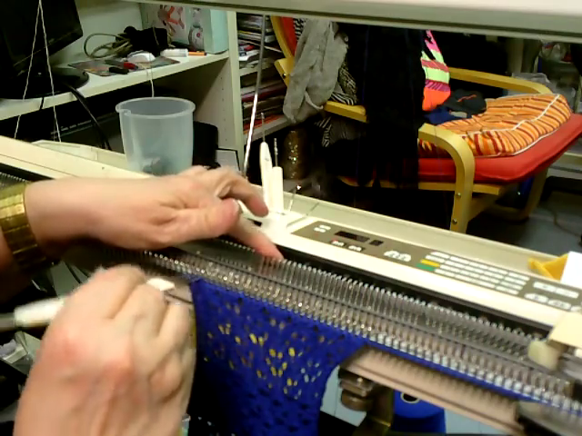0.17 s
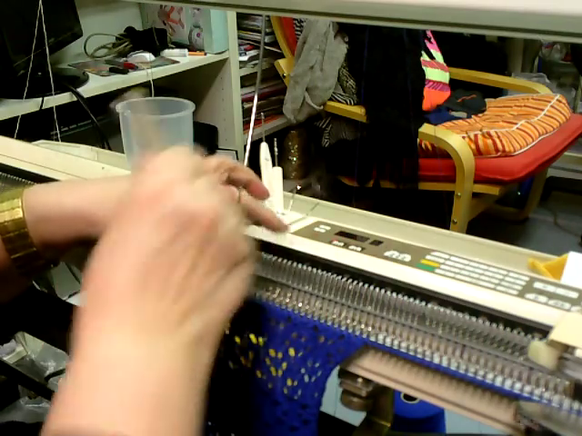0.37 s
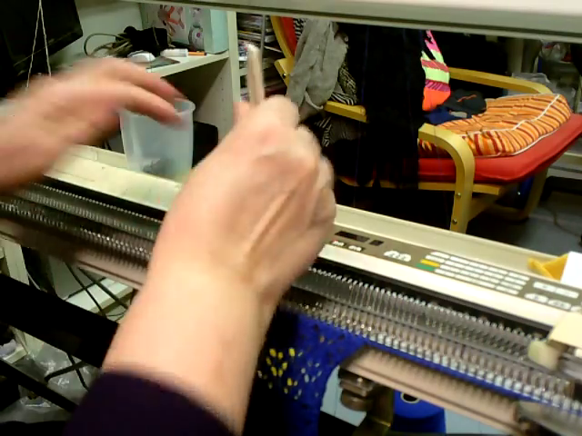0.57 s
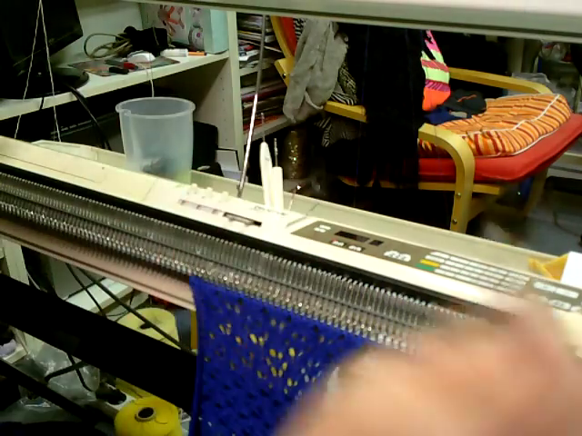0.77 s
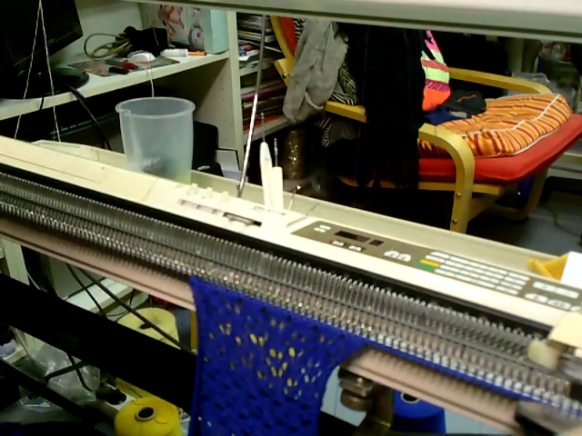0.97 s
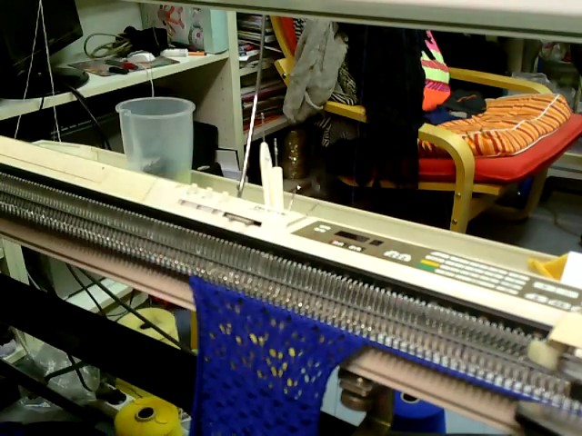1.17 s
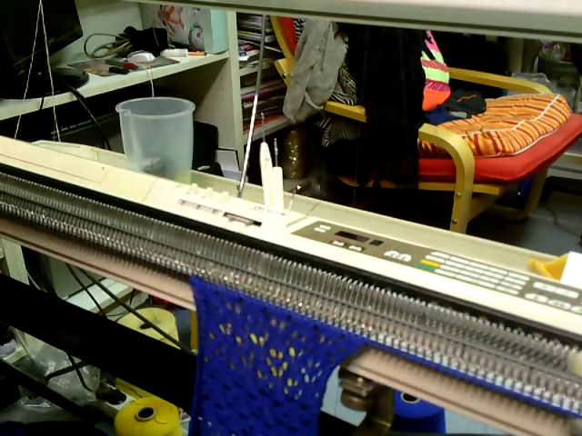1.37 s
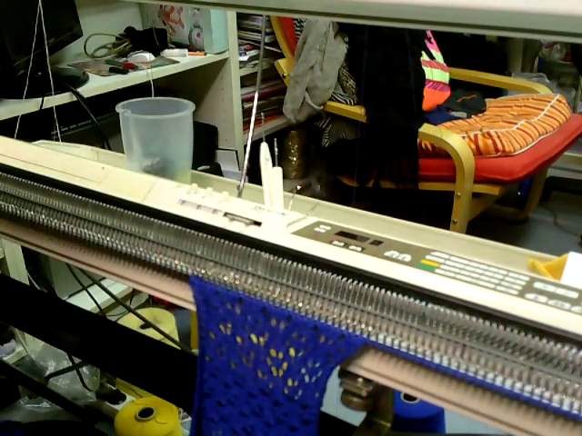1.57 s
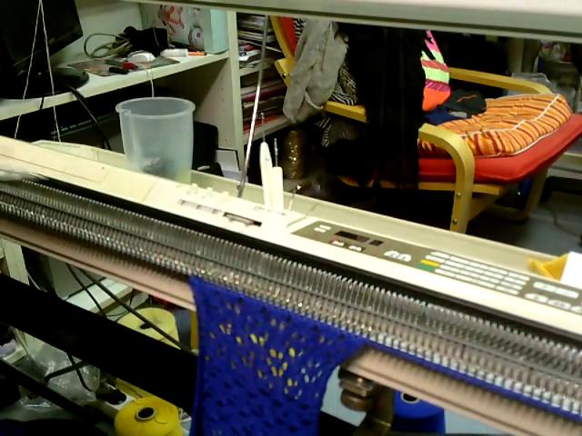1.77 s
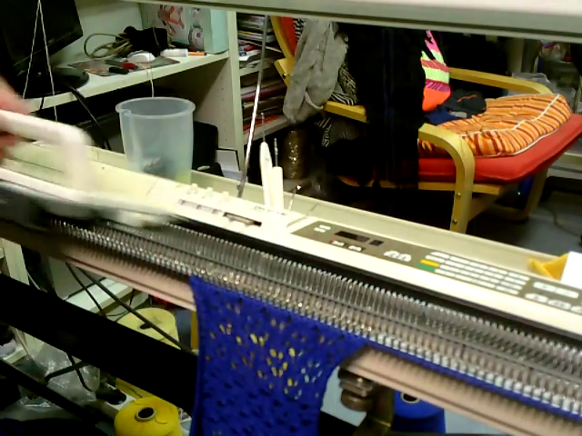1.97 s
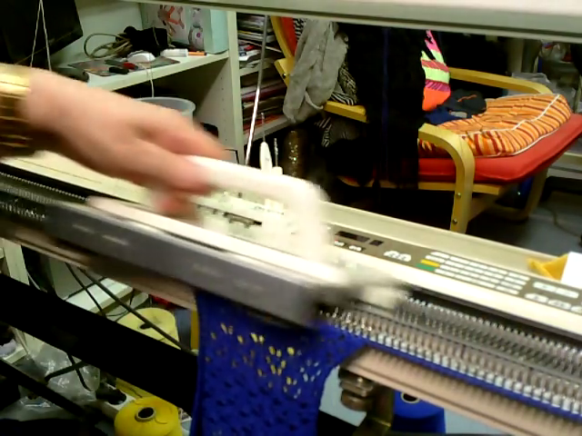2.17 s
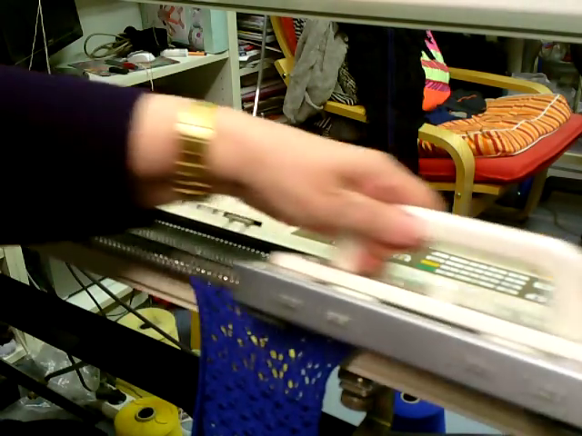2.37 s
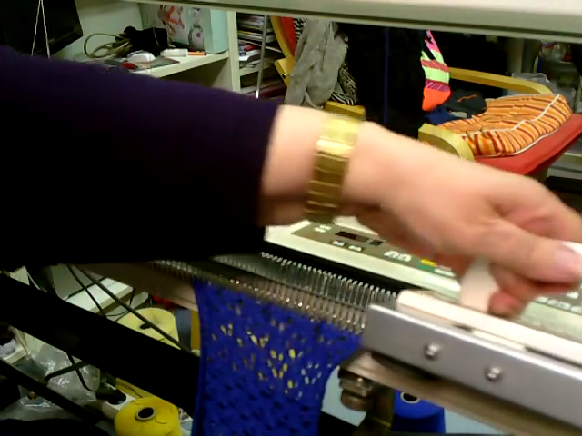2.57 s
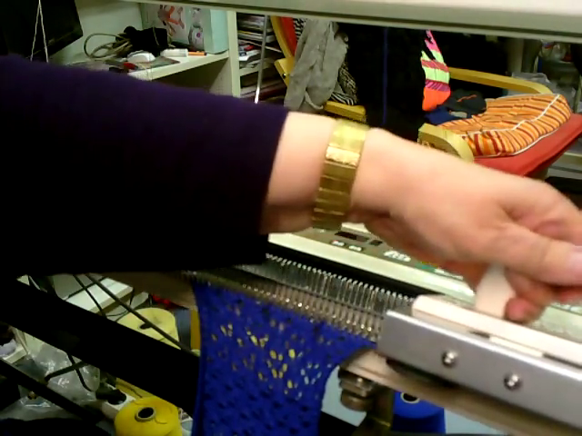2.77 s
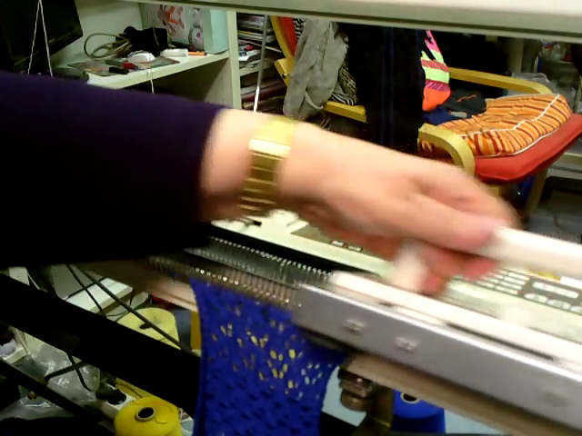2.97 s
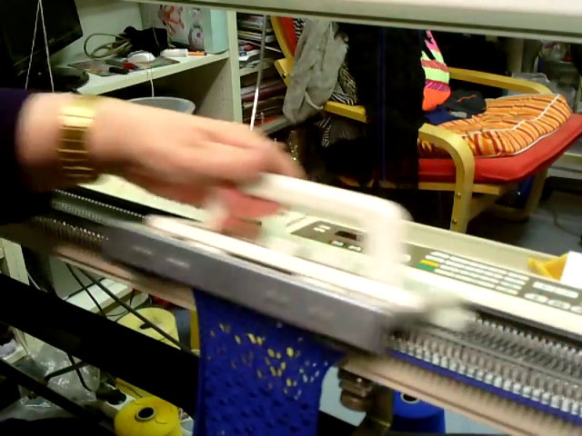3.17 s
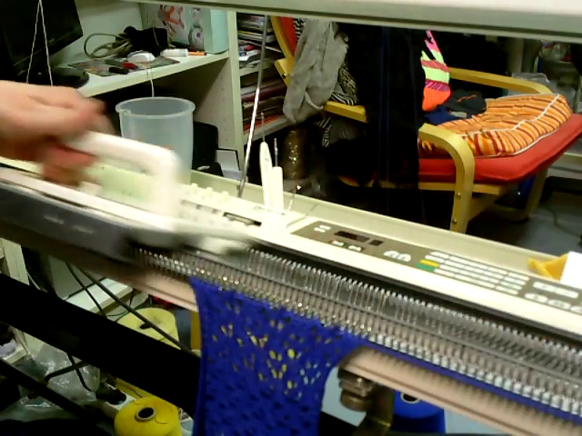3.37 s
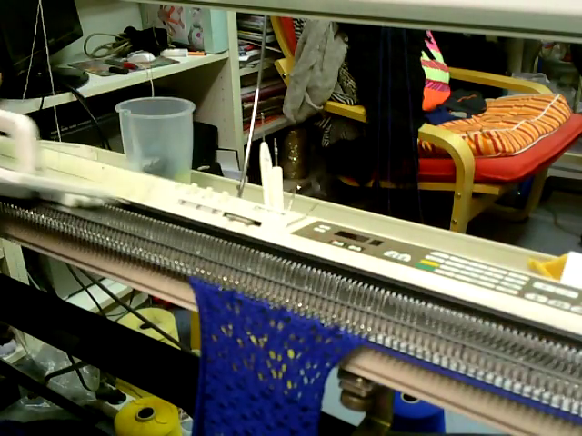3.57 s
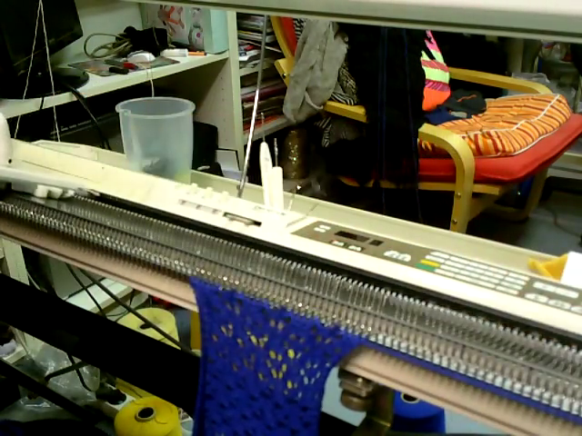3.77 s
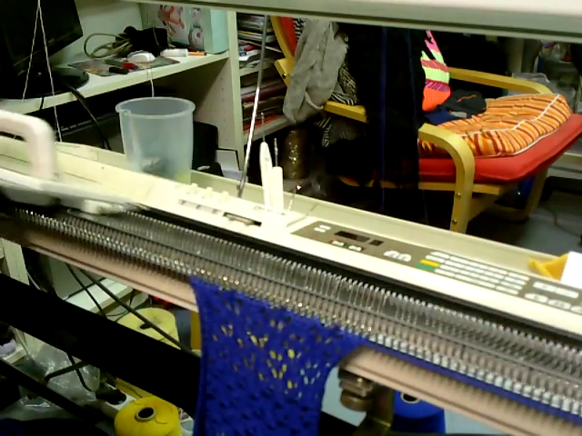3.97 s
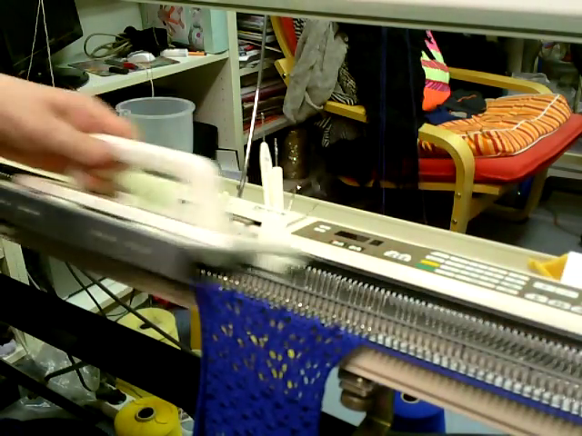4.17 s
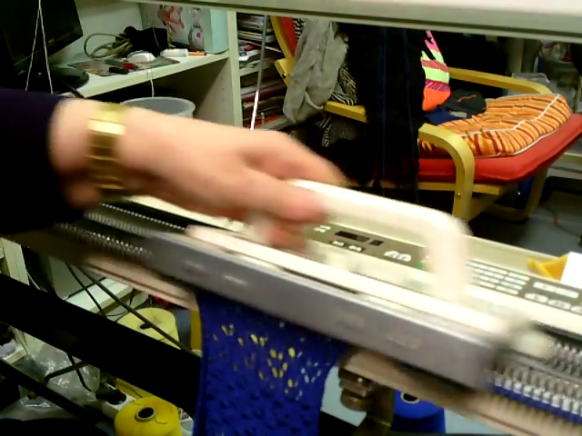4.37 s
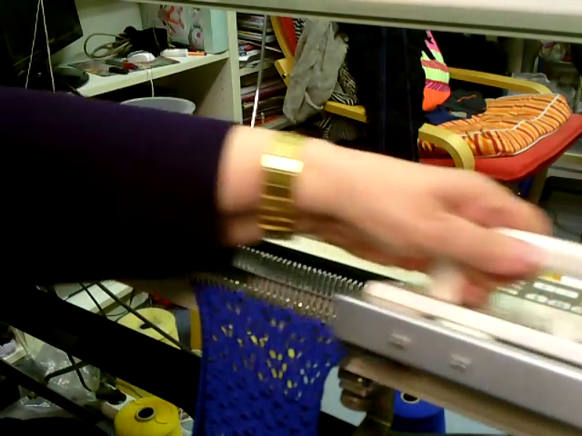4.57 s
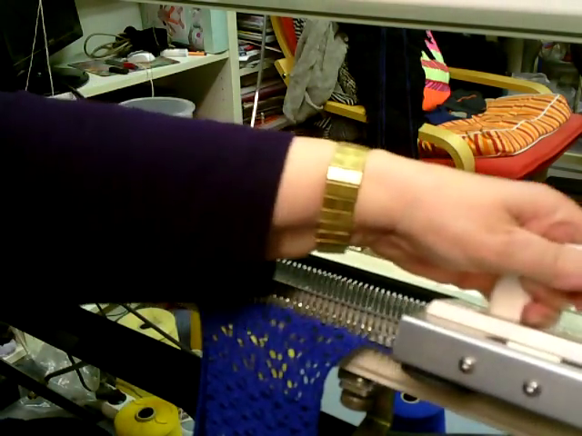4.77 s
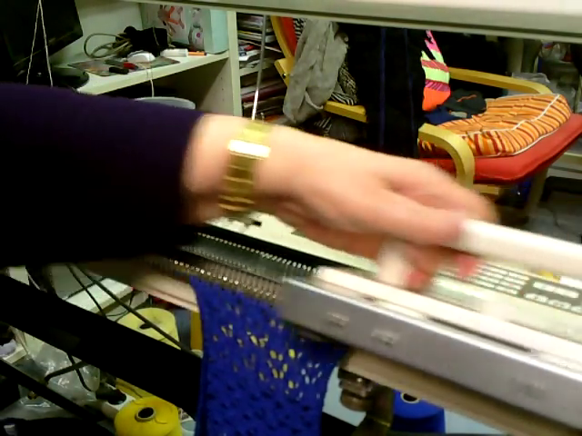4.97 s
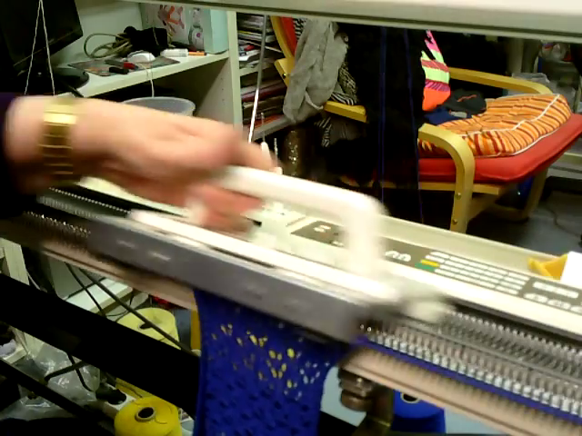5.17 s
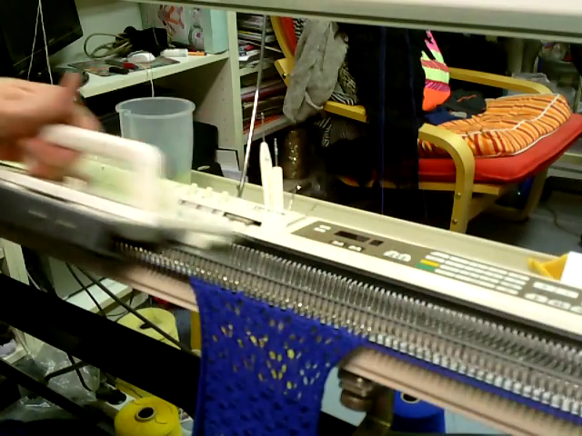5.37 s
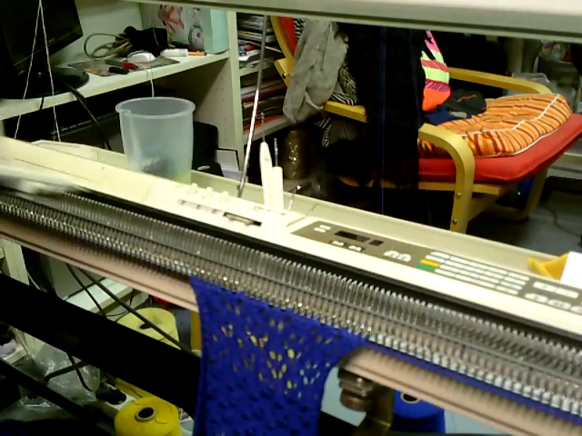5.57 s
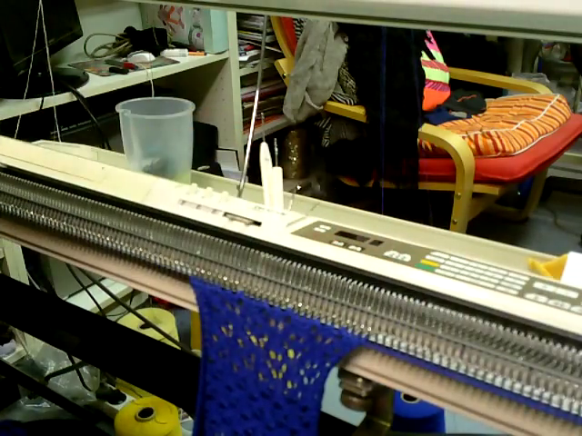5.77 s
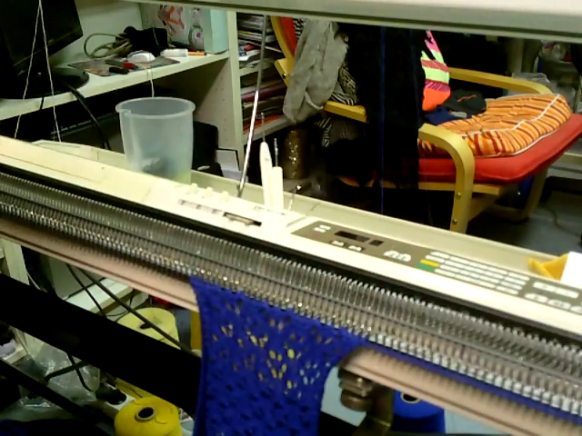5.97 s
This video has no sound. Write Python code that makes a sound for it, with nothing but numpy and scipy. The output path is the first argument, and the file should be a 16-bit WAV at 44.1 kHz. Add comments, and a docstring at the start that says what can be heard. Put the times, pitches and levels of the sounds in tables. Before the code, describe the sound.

After a sharp plastic snap, a knitting machine's carriage grinds right and left twice with a metallic zipping clatter in a small room.

```python
"""In a small workroom, hands rustle and a plastic tool drops into a knitting machine's tray with a snap.
Then the carriage, the part that slides, is pushed right along the steel needle bed. It grinds on its rail,
its cams (ramps that lift the needles) flick the needles one by one, and its levers clack near the ends.
On the way back left the cams slam into the first needles. The carriage goes right and left once more,
four passes in all, while the room adds short echoes and a faint hiss of air."""
import sys
import numpy as np
from scipy import signal
from scipy.fft import rfft, irfft
from scipy.io import wavfile
from scipy.ndimage import uniform_filter1d

SR = 44100
rng = np.random.default_rng(int(sys.argv[2]) if len(sys.argv) > 2 else 0)


def file_out(sig):
    """Save sig as 16-bit WAV at sys.argv[1]."""
    # one column per channel
    cols = np.atleast_2d(sig).T
    # limit, then scale
    lim = np.clip(cols, -1, 1)
    pcm = np.round(lim * 32767).astype(np.int16)
    wavfile.write(sys.argv[1], SR, pcm)


N = 265903
TIME = np.arange(N) / SR


# the notes at which the stand, the needle bed and the carriage shell ring: f/Hz, width/Hz, level/dB
STAND_RESONANCES = [(119, 39, -22), (160, 85, -24), (202.5, 13, -6), (254, 41, -3.5), (268, 33, -2.5),
                    (348, 62, 2)]
BED_RESONANCES = [(398.3, 35, -10.5), (448, 61, -7), (504.7, 45.5, -4), (563.5, 47.6, -7), (596, 72, -7),
                  (764, 29, -9.5), (821, 21, -2), (1016, 98, 1.5), (1165, 152, 1.5), (1324, 503, -7)]
SHELL_RESONANCES = [(1750, 380, -2), (2028, 373, 5), (2180, 346, 5.5), (2655, 394, 3), (2957, 516, 1.5),
                    (3280, 230, 3.5), (3500, 260, 1), (4110, 640, -5.5)]
# the bright tone of the steel needles and their latches: f/Hz, level/dB
STEEL_TONE = [(100, -51), (1500, -10), (3000, -23), (4000, -9.5), (4700, -0.5), (5600, 3), (6300, 1),
              (7000, 1), (8000, -0.5), (9000, 2), (10400, -0.5), (12000, 1), (13000, -1.5), (14300, -6),
              (15500, -6)]
def machine():
    """Sliding and sudden hits shake the same parts, and each part rings in its own way."""
    slide_stand, slide_bed, slide_shell, slide_steel = sliding()
    hit_bed, hit_shell, hit_steel, ping = clacks()
    stand = body(slide_stand + from_db(-21.5) * hit_bed, STAND_RESONANCES, low_hz=102, high_hz=454)
    bed = body(slide_bed + hit_bed, BED_RESONANCES, low_hz=306, high_hz=2040)
    shell = body(slide_shell + hit_shell, SHELL_RESONANCES, low_hz=1110, high_hz=5100)
    steel = colour(slide_steel + hit_steel, STEEL_TONE)
    return stand + bed + shell + steel + ping + singing_parts() + loose_parts()


def sliding():
    """The moving carriage grinds on stand and bed, and both ticks and scrapes on shell and needles."""
    bed, shell, steel, stand = part_strengths()
    share = tick_share(steel)
    hits = needle_hits()
    force_db = 0.86 * spread(len(hits))
    shell_ticks = chatter(hits, force_db, variety_db=4)
    on_shell = from_db(-1.87) * shell * blend(shell_ticks, grit(per_s=3500, spread_db=2), share)
    steel_ticks = chatter(hits, force_db, variety_db=5)
    on_steel = from_db(-1.82) * steel * blend(steel_ticks, grit(per_s=5700, spread_db=1.5), share)
    on_stand = stand * grit(per_s=3400, spread_db=3)
    on_bed = bed * grit(per_s=2500, spread_db=4)
    return on_stand, on_bed, on_shell, on_steel


# pushes, right and left in turn: t/s, length/s, speeding up/s, slowing down/s, top speed/(needles per s)
PUSHES = [(1.324, 1.47, 0.88, .66, 249), (2.86, 0.97, 0.34, 0.38, 218), (3.8, 1.02, .48, .62, 232),
          (4.834, 1.226, 0.41, 0.58, 206)]
def speed():
    """Needles passed per second: each push gathers speed smoothly, then eases to rest."""
    out = np.zeros(N)
    for start, length, rise, fall, top in PUSHES:
        ease = np.minimum((TIME - start) / rise, (start + length - TIME) / fall)
        out += top * np.sin(np.pi / 2 * np.clip(ease, 0, 1))
    return out


def needles_passed():
    """How far the carriage has travelled, counted in needles."""
    return np.cumsum(speed()) / SR


def part_strengths():
    """How hard bed, shell, steel and stand are shaken: rubbing and cam clatter add in power."""
    cams = cam_force()
    bed = np.hypot(friction(level_db=-32, steepness=1.81, drag_db=5.6), from_db(-10.5) * cams)
    shell = np.hypot(friction(level_db=-31.5, steepness=2.45, drag_db=7.26), from_db(-5.5) * cams)
    steel = np.hypot(friction(level_db=-30.5, steepness=3.36, drag_db=5.2), cams)
    stand = friction(level_db=-55.5, steepness=0.63, drag_db=6.3)
    return bed, shell, steel, stand


def friction(level_db, steepness, drag_db):
    """Rubbing on the rail grows with speed and drag, and dips when the carriage sticks."""
    drive = np.tanh(speed() / 110)   # levels off above 110 needles per second
    return from_db(level_db + drag_db * drag() + sticking_db()) * drive ** steepness


# harder going, most of all when pulling yarn to the right: t/s, length/s, load (1 is a firm pull)
DRAGS = [(1.604, .8, 1.1), (1.795, 0.14, 0.53), (3.987, 0.29, 1.24), (4.19, 0.017, 0.18), (5.48, .36, .35)]
def drag(ease_s=1.5):
    """Each extra load on the carriage sets in quickly, eases off and lets go."""
    out = np.zeros(N)
    for start, length, load in DRAGS:
        easing = np.exp(-np.maximum(TIME - start, 0) / ease_s)
        out += load * held(start, length, attack_s=0.0086, release_s=0.068) * easing
    return out


# moments when the stuck carriage comes free: t/s, dip/dB
STICKS = [(1.69, 2.5), (2.648, 5.5), (2.905, 7), (3.642, 1.5), (3.703, 6.5), (3.814, 5), (3.884, 8),
          (3.99, 4.5), (4.057, 3), (5.905, 5), (5.96, 9)]
def sticking_db(build_s=0.035, rebound_s=0.076, rebound_share=0.24):
    """The sound sinks as the carriage sticks, then is briefly louder as it jerks free."""
    out = np.zeros(N)
    for t, dip_db in STICKS:
        sink = -np.exp(-((TIME - t) / build_s) ** 2)
        rebound = rebound_share * np.exp(-((TIME - t) / rebound_s) ** 2)
        out += dip_db * np.where(TIME < t, sink, rebound)
    return out


# the cams cross a group of working needles: t/s, length/s, fade-in/s, first level/dB, last level/dB
NEEDLE_GROUPS = [(1.796, 0.68, 0.19, -22, -24), (2.124, .13, 0.032, -31, -37),
                 (3.01, 0.3, 0.036, -21, -21.5), (4.236, 0.31, 0.04, -18, -29),
                 (4.987, 0.35, 0.06, -19.5, -24)]
def cam_force():
    """Strength of the clatter while working needles are inside the cams."""
    out = np.zeros(N)
    for start, length, fade_in, first_db, last_db in NEEDLE_GROUPS:
        level_db = np.interp(TIME, [start, start + length], [first_db, last_db])
        out += from_db(level_db) * held(start, length, fade_in, release_s=0.03)
    return out


def tick_share(steel, cam_ticks=0.95, rail_ticks=0.31, blur_per_s=205):
    """How much of the clatter is clear ticks: slow needles tick one by one, fast ones blur into a zip."""
    in_cams = (cam_force() / (steel + 1e-9)) ** 2
    return in_cams * cam_ticks / (1 + (speed() / blur_per_s) ** 4) + (1 - in_cams) * rail_ticks


def needle_hits(wobble=0.046):
    """Samples at which the cams meet a needle: evenly spaced along the bed, with a little wobble."""
    passed = needles_passed()
    needles = np.arange(1, int(passed[-1]) - 1)
    places = needles + wobble * rng.standard_normal(len(needles))
    return np.minimum(np.searchsorted(passed, places), N - 1)


def chatter(hits, force_db, variety_db, t60=0.024):
    """Each needle buzzes against the cam with its own tone; t60 is the seconds taken to fade by 60 dB."""
    out, edges_hz = 0, np.geomspace(700, 16000, num=9)
    decay = from_db(-120 / (t60 * SR))
    for low, high in zip(edges_hz, edges_hz[1:]):
        kicks = np.zeros(N)
        kicks[hits] = from_db(force_db + variety_db * spread(len(hits))) ** 2
        power = signal.lfilter([1 - decay], [1, -decay], kicks + 1e-12)
        power /= uniform_filter1d(power, size=3500) + 1e-9   # keep the average level steady
        out += np.sqrt(power) * soft_filter(rng.standard_normal(N), [low, high], "band")
    return rms_one(out)


# dull knocks of the carriage rocking on its rail: t/s, bed level/dB, shell level/dB
RAIL_KNOCKS = [(1.457, -31, -32.5), (1.4743, -25.5, -43), (1.6236, -17.5, -22), (2.485, -20.5, -19),
               (2.6486, -26.5, -30.5), (2.907, -40, -44), (2.937, -48, -40), (3.01, -20.5, -21),
               (3.6415, -23.5, -24.5), (3.7035, -28, -26.5), (3.726, -33, -27.5), (3.8147, -43, -45),
               (3.8922, -31.5, -42), (3.99, -23.5, -43), (4.2225, -28, -17), (4.7524, -33, -41),
               (4.89, -44, -50), (4.971, -28, -31), (5.153, -26, -20), (5.7069, -26.5, -41),
               (5.9079, -45, -39), (6.0103, -30, -37.5)]
# sharp clicks of levers and latches: t/s, shell level/dB, steel level/dB, f/Hz, fade time/s
LEVER_CLICKS = [(1.383, -46, -44, 5230, 0.03), (1.425, -46, -42, 3030, 0.033),
                (1.5244, -21.5, -22, 3040, 0.061), (1.705, -26, -27, 2730, 0.026),
                (2.5774, -18, -17, 3550, 0.014), (2.8484, -44, -64, 2180, 0.021),
                (3.07, -16, -25, 3770, .015), (3.1218, -20.5, -18, 3280, 0.038),
                (3.168, -19, -35, 3310, .034), (3.34, -21, -14, 2620, 0.044),
                (4.2464, -22, -13, 2685, 0.029), (4.3645, -18.5, -17, 3480, .027),
                (4.436, -23.5, -22, 3373, 0.044), (4.557, -27.5, -21, 2630, 0.045),
                (4.6529, -22.5, -21.5, 3490, 0.018), (4.8534, -37.5, -48, 2133, 0.017),
                (4.9162, -43, -35.5, 3300, .037), (5.0067, -18.5, -21, 3240, .029),
                (5.327, -30, -13.5, 3170, 0.036), (5.388, -28, -24, 3300, 0.022),
                (5.9064, -30.5, -39, 4525, 0.024)]
def clacks():
    """Knocks, clicks and slams jolt the bed, shell and steel; clicks and slams also ping."""
    t, bed_db, shell_db = np.transpose(RAIL_KNOCKS)
    knocks = strike(t, bed_db, shell_db, steel_db=shell_db - 7, t60=np.full(len(t), 0.054))
    t, shell_db, steel_db, ring_hz, t60 = np.transpose(LEVER_CLICKS + slam_clicks())
    clicks = strike(t, shell_db - 7.5, shell_db, steel_db, t60)
    on_bed, on_shell, on_steel = knocks + clicks
    return on_bed, on_shell, on_steel, pings(t, shell_db + 4, ring_hz, t60 * 1.03)


# going left, the cams slam into the first needles: t/s, level/dB
CAM_SLAMS = [(3.0287, -8), (5.016, -11.5)]
def slam_clicks(count=13, ring_hz=3280, t60=0.018):
    """Each slam is a fading run of clicks, one per needle passed; rows as in LEVER_CLICKS."""
    passed, needles, rows = needles_passed(), np.arange(count), []
    for start, first_db in CAM_SLAMS:
        times = np.searchsorted(passed, passed[int(start * SR)] + needles) / SR
        levels_db = first_db - 4.5 * np.log2(1 + needles)
        rows += [(t, db - 5.5, db, ring_hz, t60) for t, db in zip(times, levels_db)]
    return rows


def strike(times, bed_db, shell_db, steel_db, t60):
    """A hit gives the bed one hard push and a short rattle, and the shell and steel a burst of noise."""
    on_bed = bursts(times, bed_db, t60, rise_s=0.0005) * grit(per_s=11000, spread_db=4)
    on_bed[(times * SR).astype(int)] += from_db(bed_db + 20)   # the hard push
    on_shell = bursts(times, shell_db + 0.5, t60, rise_s=0.00084) * rng.standard_normal(N)
    on_steel = bursts(times, steel_db + 3.5, t60 * 0.77, rise_s=0.00065) * rng.standard_normal(N)
    return np.array([on_bed, on_shell, on_steel])


def pings(times, levels_db, pitches_hz, t60s):
    """Each struck part rings for an instant at its own pitch."""
    out = np.zeros(N)
    for t, db, hz, t60 in zip(times, levels_db, pitches_hz, t60s):
        start = int(t * SR)
        age = TIME[:min(N - start, SR // 8)]
        fade = hit_shape(age, db, t60, rise_s=0.00017)
        out[start:start + len(age)] += fade * np.sin(2 * np.pi * hz * age)
    return out


# brief singing rubs: t/s, length/s, f/Hz, width/Hz, level/dB
RUBS = [(1.77, 0.39, 800, 130, -30), (3.07, 0.058, 3280, 170, -35), (3.367, .06, 11800, 450, -33),
        (4.2, 0.097, 8555, 349.6, -27.5), (4.418, 0.023, 7240, 291, -23), (5.14, 0.1, 9510, 350.3, -26),
        (5.364, 0.052, 11700, 453.6, -29), (5.618, 0.38, 514.3, 69.5, -40)]
def singing_parts():
    """Parts sing for a moment as they rub, each around one pitch."""
    return sum(from_db(db) * swell(t, length) * rub(hz, width) for t, length, hz, width, db in RUBS)


def loose_parts():
    """Carriage springs and needle latches jingle in step with the rattle and the clatter."""
    _, shell, steel, _ = part_strengths()
    springs = from_db(-10) * shell * tinkle(low_hz=2010, high_hz=3614, per_s=220, width_hz=67, count=11)
    latches = from_db(-12.5) * steel * tinkle(low_hz=5520, high_hz=12660, per_s=300, width_hz=81, count=20)
    return springs + latches


def tinkle(low_hz, high_hz, per_s, width_hz, count):
    """Random taps set small parts ringing, each kind at its own pitch."""
    taps, kind = grit(per_s, spread_db=1), rng.integers(0, count, N)
    trace = 1e-18 * rng.standard_normal(N)   # too faint to hear; keeps the filters fast
    pitches = np.geomspace(low_hz, high_hz, count)
    return rms_one(sum(resonate(taps * (kind == k) + trace, hz, width_hz) for k, hz in enumerate(pitches)))


# the tool's two landings: t/s, body level/dB, body fade time/s, snap level/dB
LANDINGS = [(0.5156, -19.5, 0.042, -32), (0.529, -24, 0.054, -8)]
# the tone of its hollow body and of its hard snap: f/Hz, level/dB
HOLLOW_TONE = [(60, -39), (150, -19), (270, -8), (400, 5), (650, -2), (1100, 0.5), (1500, -8), (2300, -9),
               (3200, -4), (4400, -8), (6000, -2), (10000, -13), (13000, -1), (15500, -25)]
SNAP_TONE = [(100, -40), (1500, -21), (3300, 2.5), (5500, -3), (7000, -9), (10500, -8), (13200, 2),
             (15500, -13)]
def hand_tool():
    """One end of the tool skitters on the tray, then the other slaps down with a hard snap."""
    t, body_db, t60, snap_db = np.transpose(LANDINGS)
    skitter = bursts(t, body_db, t60, rise_s=0.0017) * rng.standard_normal(N)
    snap = bursts(t, snap_db, t60s=np.full(len(t), 0.0075), rise_s=0.00024) * rng.standard_normal(N)
    return colour(skitter, HOLLOW_TONE) + colour(snap, SNAP_TONE)


# hands brushing the needles, the knitting and the handle: t/s, length/s, f/Hz, level/dB
RUSTLES = [(0.386, 1, 1160, -58.5), (0.745, .035, 3000, -57.5), (1.157, 0.038, 1200, -57),
           (1.276, 0.042, 3220, -53.5), (2.796, 0.17, 745, -61.5), (4.82, .12, 796, -59)]
def hands():
    """Fingers at work make soft, broad rustles."""
    return sum(from_db(db) * swell(t, length) * rub(hz, hz * 1.02) for t, length, hz, db in RUSTLES)


def moving_echoes(x, count=3, stretch_needles=7):
    """The echoes change as the carriage travels: a few patterns take turns along the bed."""
    place, out = needles_passed() / stretch_needles, 0
    for k in range(count):
        distance = np.abs((place - k) % count - count / 2)
        nearness = np.sqrt(np.clip(1 - distance, 0, 1))
        out += room_echoes(x * nearness, low_t60=0.29, high_t60=0.31, split_hz=2750)
    return out


def room_echoes(x, low_t60, high_t60, split_hz):
    """A cluttered room blurs its echoes together; lows and highs fade at their own rates."""
    age = TIME[:SR // 3]
    lows = soft_filter(rng.standard_normal(len(age)), split_hz, "low") * from_db(-60 * age / low_t60)
    highs = soft_filter(rng.standard_normal(len(age)), split_hz, "high") * from_db(-60 * age / high_t60)
    return convolve(x, (lows + highs) * (age > 0.003))


# the tone of the quiet room: f/Hz, level/dB
AIR_TONE = [(18, -42), (30, -20), (71, -22), (130, -15), (359, -6), (709, -5), (921, -5), (1050, -6.5),
            (5890, -14), (11600, -15.5), (15500, -20.5)]
def still_air():
    """The room's air makes a faint, steady hiss."""
    return from_db(-59) * colour(rng.standard_normal(N), AIR_TONE)


def body(x, resonances, low_hz, high_hz):
    """A shaken part rings at several fading notes, heard mostly between low_hz and high_hz."""
    age = TIME[:4096]
    ring = sum((-1) ** k * from_db(db) * width * np.exp(-np.pi * width * age) * np.cos(2 * np.pi * hz * age)
               for k, (hz, width, db) in enumerate(resonances))
    return convolve(x, soft_filter(ring, [low_hz, high_hz], "band"))


def colour(x, tone, size=4096):
    """Give x the tone in a table of f/Hz, level/dB."""
    hz, db = np.transpose(tone)
    grid_hz = np.maximum(np.arange(size // 2 + 1) * SR / size, 1)
    gains = from_db(np.interp(np.log(grid_hz), np.log(hz), db))
    # minimum phase: the ringing comes after a hit, never before
    cepstrum = irfft(np.log(gains))
    cepstrum[1:size // 2] *= 2
    cepstrum[size // 2 + 1:] = 0
    return convolve(x, irfft(np.exp(rfft(cepstrum))))


def grit(per_s, spread_db):
    """Tiny random collisions of uneven size."""
    sizes = from_db(spread_db * spread(N)) * rng.choice([-1, 1], N)
    return rms_one(sizes * (rng.random(N) < per_s / SR))


def rub(hz, width_hz):
    """Rubbing noise around one pitch."""
    return rms_one(resonate(rng.standard_normal(N), hz, width_hz))


def bursts(times, levels_db, t60s, rise_s):
    """The strength of a series of hits over time."""
    power = np.zeros(N)
    for t, db, t60 in zip(times, levels_db, t60s):
        start = int(t * SR)
        age = TIME[:min(N - start, SR // 4)]
        power[start:start + len(age)] += hit_shape(age, db, t60, rise_s) ** 2
    return np.sqrt(power)


def hit_shape(age, db, t60, rise_s):
    """One hit swells quickly and dies away."""
    return from_db(db - 60 * age / t60) * (1 - np.exp(-age / rise_s))


def held(start, length, attack_s, release_s):
    """A level that rises, holds and dies away."""
    age = TIME - start
    return np.clip(age / attack_s, 0, 1) * np.exp(-np.maximum(age - length, 0) / release_s)


def swell(t, length):
    """A smooth rise and fall around a moment."""
    return np.exp(-(2 * (TIME - t) / length) ** 2)


def blend(ticks, scrape, share):
    """Mix ticking and scraping at constant power."""
    share = np.clip(share, 0, 1)
    return np.sqrt(share) * ticks + np.sqrt(1 - share) * scrape


def resonate(x, hz, width_hz):
    """Ring at one pitch; a narrower width rings longer."""
    r = np.exp(-np.pi * width_hz / SR)
    return signal.lfilter([1, 0, -1], [1, -2 * r * np.cos(2 * np.pi * hz / SR), r * r], x)


def soft_filter(x, hz, kind):
    """Gently keep the lows, the highs or a band."""
    return signal.sosfilt(signal.butter(2, hz, kind, fs=SR, output="sos"), x)


def convolve(x, response):
    """Let each sample of x set off the response, scaled to an energy of 1."""
    return signal.oaconvolve(x, response / np.linalg.norm(response))[:N]


def spread(count):
    """Random numbers near 0, never beyond 2 either way."""
    return np.clip(rng.standard_normal(count), -2, 2)


def rms_one(x):
    """Scale to an average strength (rms) of 1."""
    return x / np.sqrt(np.mean(x ** 2) + 1e-20)


def from_db(db):
    """Turn decibels into a multiplier."""
    return 10 ** (np.asarray(db) / 20)


def scene():
    """Machine, tool and hands in the room, over still air."""
    knitting, tool = machine(), hand_tool()
    echoes = from_db(-13.5) * moving_echoes(knitting)
    echoes += from_db(-9) * room_echoes(tool, low_t60=0.25, high_t60=0.14, split_hz=2700)
    return (knitting + tool + echoes + hands() + still_air())[None]


def record(dry, cutoff_hz=15500):
    """Cut the very highest treble steeply."""
    return signal.sosfilt(signal.ellip(12, 0.1, 80, cutoff_hz, fs=SR, output="sos"), dry)


dry = scene()
out = record(dry)
file_out(out)
```